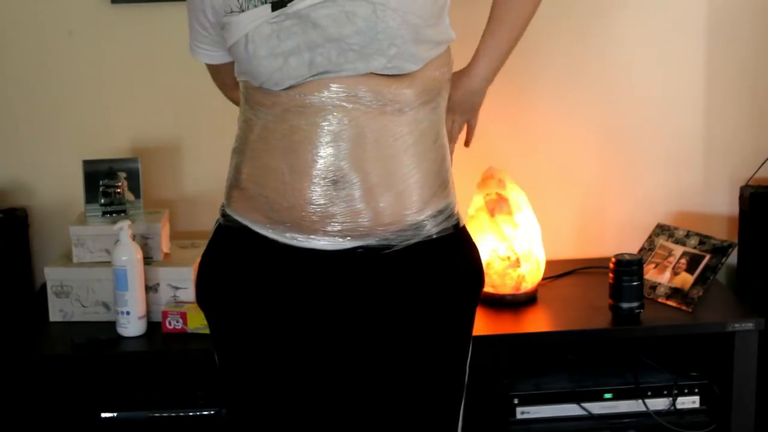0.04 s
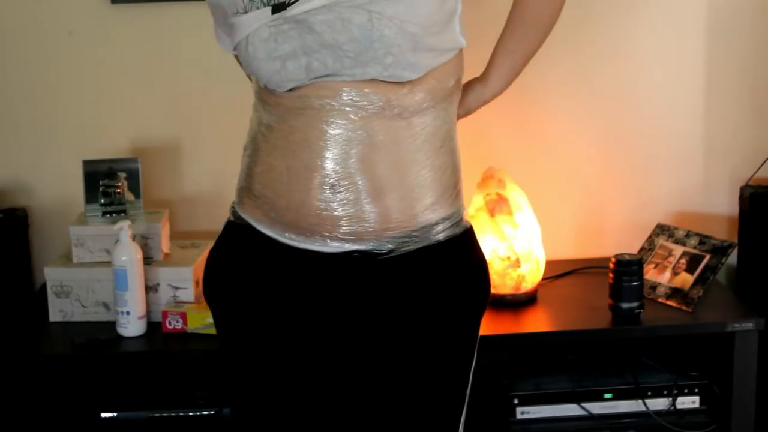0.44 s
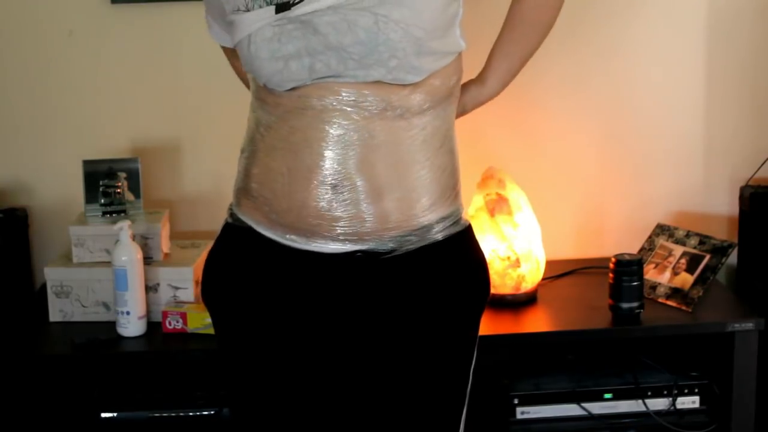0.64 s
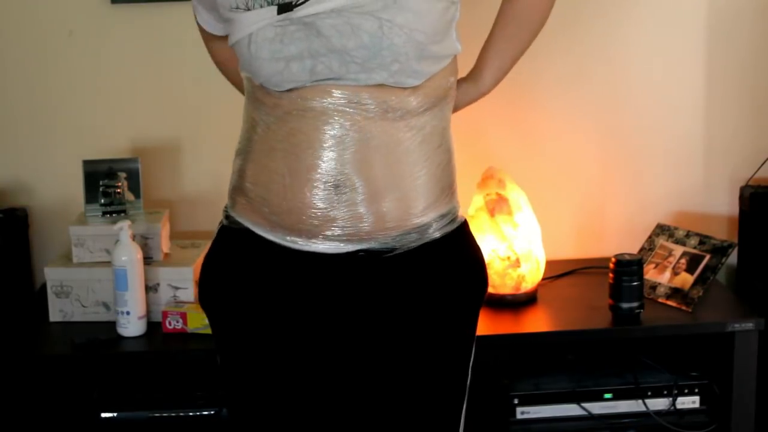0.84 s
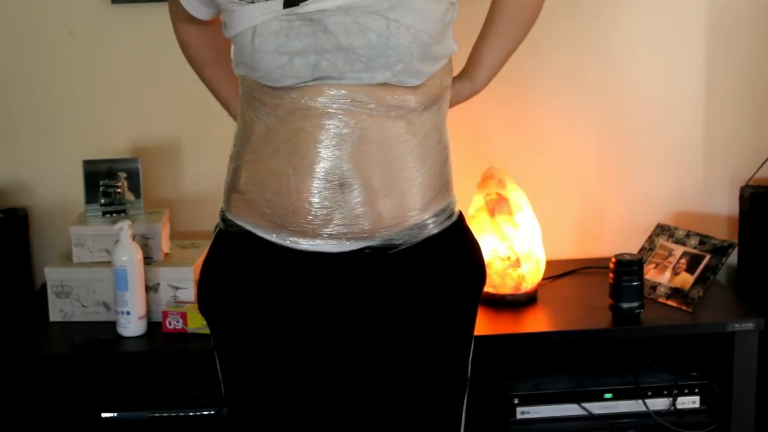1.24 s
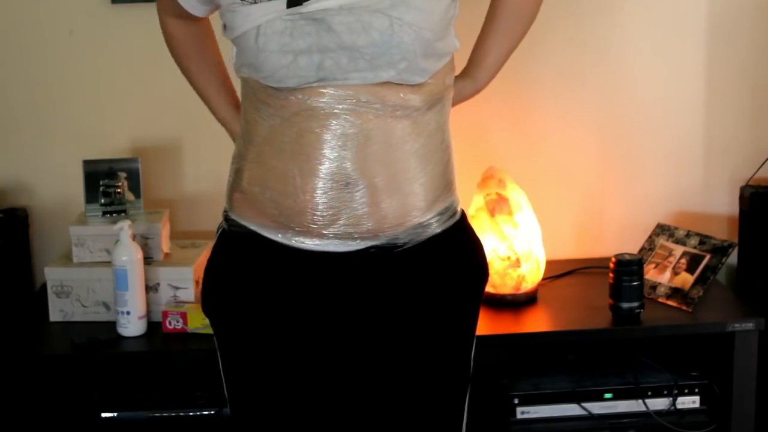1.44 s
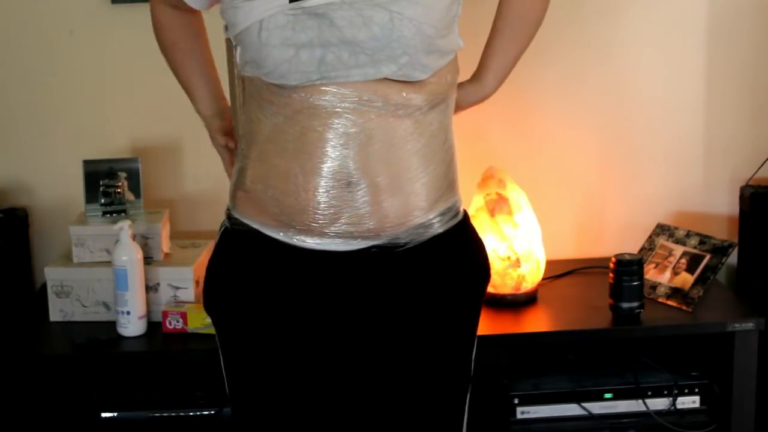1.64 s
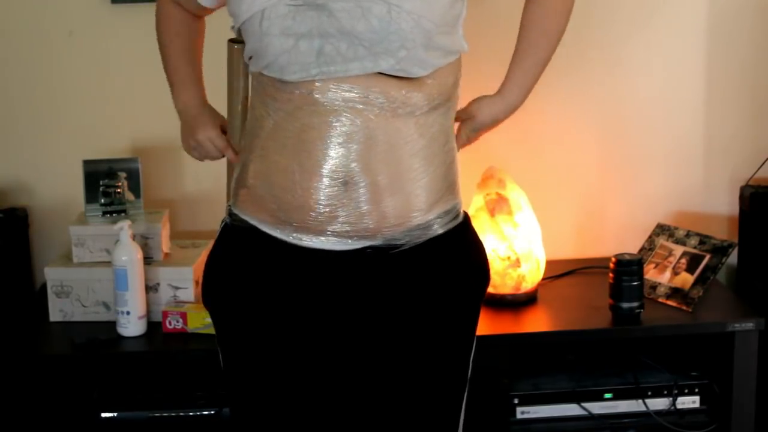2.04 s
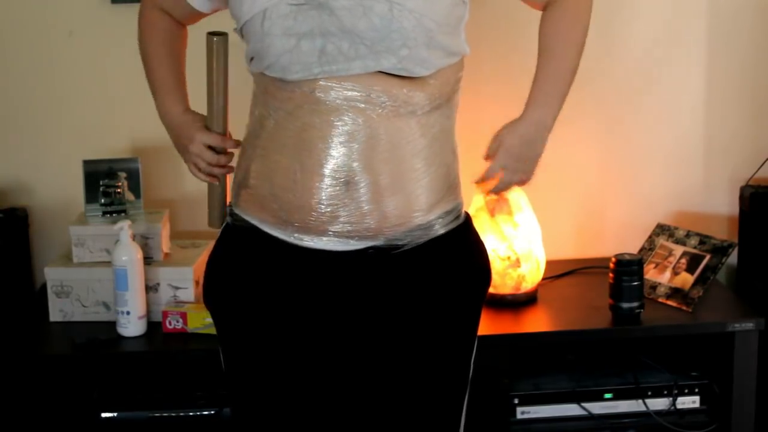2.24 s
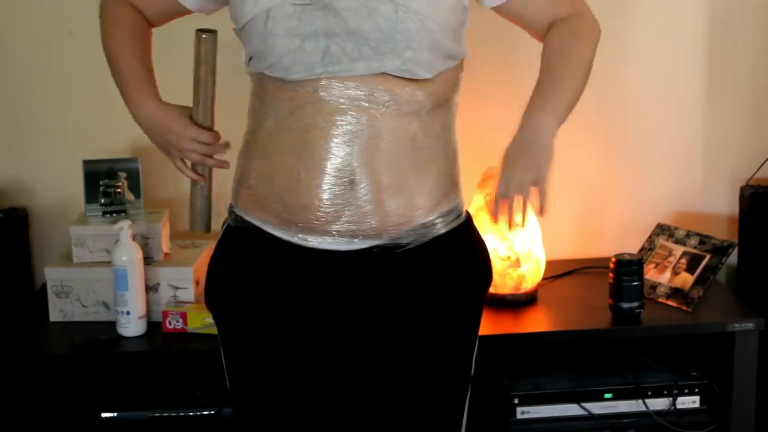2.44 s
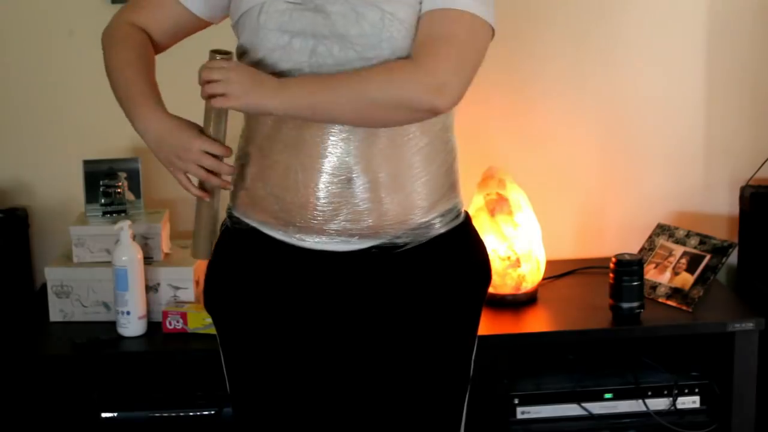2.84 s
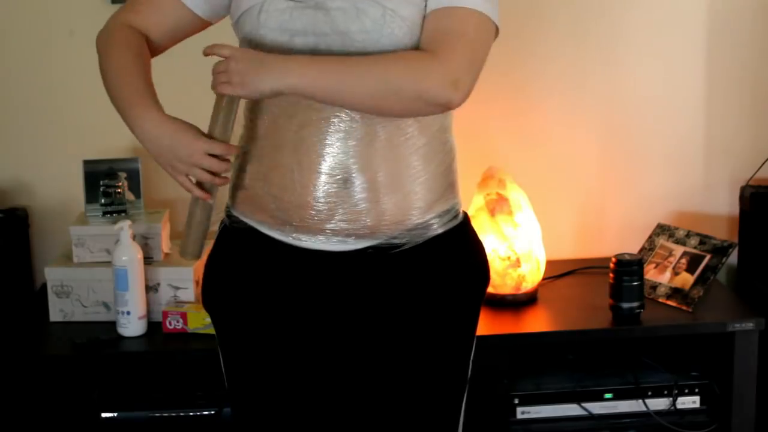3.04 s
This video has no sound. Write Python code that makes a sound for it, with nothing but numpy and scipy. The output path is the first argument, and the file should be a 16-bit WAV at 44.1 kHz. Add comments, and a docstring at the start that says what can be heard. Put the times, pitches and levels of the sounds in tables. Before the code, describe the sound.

Plastic cling film crackles, snaps and squeaks as it is wrapped around a waist.

```python
"""Cling film is pulled off a roll and wound round a waist in a small quiet room.
Pulls peel and rub in swells of dense crackle. Stuck patches let go in snaps, cascades of tiny clicks,
and the large patches ring the taut sheet. In between, the stretched film fizzes, ticks and squeaks.
The wall behind returns a quick inverted echo, ahead of a short diffuse tail."""
import sys
import numpy as np
from scipy import signal
from scipy.fft import rfft, irfft, next_fast_len
from scipy.io import wavfile
from scipy.ndimage import uniform_filter1d

SR = 44100
rng = np.random.default_rng(int(sys.argv[2]) if len(sys.argv) > 2 else 0)


def generate_wav(sig):
    """Save sig (samples, or channels by samples) to the path in sys.argv[1] as 16-bit PCM at SR."""
    pcm = np.round(np.clip(np.atleast_2d(sig).T, -1, 1) * 32767).astype(np.int16)
    wavfile.write(sys.argv[1], SR, pcm)


N = 141120  # 3.2 s

# EQ of film rubbing on film, for pulls and squeaks: (frequency [Hz], gain [dB])
RUB_COLOUR = [(50, -34), (130, -18), (300, -1), (700, 0), (1500, 3.5), (3000, 2.5), (5000, 1), (7500, -2.5),
              (12000, -1.5), (16000, -9)]


def undb(db):
    """Decibels to gain."""
    return 10 ** (np.asarray(db) / 20)


def unit(x):
    """Scale to an energy of one."""
    return x / np.sqrt(np.sum(x ** 2) + 1e-18)


def gains(points, size):
    """Gain at each FFT bin from (frequency [Hz], gain [dB]) points."""
    hz, db = np.array(points, float).T
    return undb(np.interp(np.log(np.fft.rfftfreq(size, 1 / SR) + 1), np.log(hz), db))


def colour(x, *curves):
    """Stack EQ curves into one minimum-phase filter of unit power gain."""
    size = 2 * next_fast_len(len(x) // 2 + 1024)
    gain = np.prod([gains(curve, size) for curve in curves], axis=0)
    cepstrum = irfft(np.log(gain / np.sqrt(np.mean(gain ** 2))))
    cepstrum[1:size // 2] *= 2  # fold forward in time, so nothing rings ahead of a click
    cepstrum[size // 2 + 1:] = 0
    return irfft(rfft(x, size) * np.exp(rfft(cepstrum)))[:len(x)]


def patch_eq(bass, middle, treble):
    """Three-band EQ of one patch of film, in dB against its upper middle."""
    return [(450, bass), (1100, middle), (2200, middle), (4500, 0.008), (9000, treble)]


def clicks(size, per_s, spread_db):
    """Random clicks of either sign, rms one; a positive spread makes a few stand out."""
    size_draw, time_draw, sign_draw = rng.random((size, 3)).T
    strength = undb(spread_db * np.minimum(-np.log(1 - size_draw), 4.5))
    fires = time_draw < per_s / SR
    return unit(fires * np.sign(sign_draw - .5) * strength) * np.sqrt(size)


def add(out, x, start):
    """Mix a sound in at a time in seconds."""
    i = int(round(start * SR))
    x = x[max(-i, 0):max(N - i, 0)]
    out[max(i, 0):max(i, 0) + len(x)] += x


def swell(rise, fall):
    """An envelope that grows and dies exponentially, and the seconds up to its peak."""
    t = np.arange(-int(SR / 4), int(SR / 4)) / SR
    return np.exp(np.where(t < 0, t / rise, -t / fall)), -t[0]


def creep():
    """The stretched film keeps fizzing as the body moves, with lone ticks in between."""
    # fader ride of the fine crackle: (time [s], level [dB])
    ride = [(0, -41.5), (.42, -48.5), (0.509, -50), (.66, -44.5), (.72, -49), (.8, -42.5), (.94, -45.5),
            (1.02, -45), (1.08, -50), (1.2, -44), (1.25, -52), (1.6, -47), (1.98, -43), (2.2, -46),
            (2.34, -44), (2.46, -50.5), (2.76, -46), (3.15, -53.5)]
    # its thin, bright EQ: (frequency [Hz], gain [dB])
    fizz_colour = [(50, -33), (200, -8), (700, -0.5), (1500, 2.5), (4000, 4), (7500, 3), (13000, 4.5),
                   (16000, 4)]
    level = undb(np.interp(np.arange(N) / SR, *np.array(ride).T))
    fizz = undb(-3.5) * clicks(N, per_s=2200, spread_db=-1.0)
    ticks = undb(-7) * clicks(N, per_s=220, spread_db=3.5)
    return colour((fizz + ticks) * level, fizz_colour)


def pulls():
    """The film peels from the roll and drags over the wrap in swells of dense crackle."""
    # tugs on the film: (peak time [s], rise [s], fall [s], level [dB], bass [dB], middle [dB],
    # treble [dB])
    tugs = [(0.086, 0.041, 0.019, -40.5, 9.5, 5, 1.5), (.165, 0.021, .02, -24.5, 8.5, 2.5, -2),
            (0.281, 0.011, 0.045, -36, -13, -6, 1.5), (0.394, 0.0086, 0.016, -31, -3, 2, 3.5),
            (.419, 0.0064, 0.016, -37.5, 4.5, 4, 6), (0.585, 0.009, 0.013, -36.5, 2.5, 7.5, 5.5),
            (.862, 0.031, 0.014, -36, -8, 0, -1), (.975, 0.011, 0.015, -42, -21, -6, 3.5),
            (1.162, 0.021, 0.02, -36, 4.5, 0.5, 3.5), (1.317, 0.014, 0.0089, -38.5, 10, 7, 0),
            (1.36, 0.015, 0.022, -36, 2, -6, -2), (1.42, 0.0034, 0.0082, -30, 5.5, 5, 2.5),
            (1.545, 0.012, 0.007, -43, 13, 11, -1), (1.681, 0.023, 0.01, -33.5, -29, -3, -3),
            (1.765, 0.012, 0.012, -33.5, -6, -4, 1.5), (1.835, 0.022, 0.043, -32.5, -3.5, -1, -3),
            (1.886, 0.0065, 0.014, -29.5, -21, -5, -12.5), (2.035, 0.008, .02, -41.5, 1, 0.5, 0),
            (2.104, 0.019, 0.018, -29.5, -5.5, -4, 0), (2.126, 0.02, 0.015, -30, -9.5, -1, -1),
            (2.264, 0.015, 0.014, -35.5, -23, -2, -5), (2.56, 0.023, 0.0076, -29.5, 9, 0.5, 3),
            (2.608, 0.0085, 0.033, -33, 12, 1, -1), (2.664, 0.031, 0.011, -30.5, 10, 6, 2.5),
            (2.811, .008, .014, -44.5, -1, -2, 3.5), (2.9, 0.012, 0.019, -25, 2.5, 4, 1),
            (2.985, 0.0077, 0.0092, -43, -6, -3, 1), (3.055, 0.0098, 0.021, -44, -5, 0, -3)]
    out = np.zeros(N)
    for peak, rise, fall, db, bass, middle, treble in tugs:
        env, lead = swell(rise, fall)
        crackle = clicks(len(env), per_s=7000, spread_db=1.5) * env
        add(out, undb(db) * colour(crackle, RUB_COLOUR, patch_eq(bass, middle, treble)), peak - lead)
    return out


def snaps():
    """A stuck patch lets go: small clicks build up to one sharp click and die away in a cascade."""
    # patches letting go: (start [s], relative level [dB], relative bass [dB], relative middle [dB],
    # relative treble [dB], build-up [s], cascade decay [s], cascade against the main click [dB])
    releases = [(0.129, -9.5, -31, -14, -17, 0.0031, 0.006, 13),
                (0.136, -9.5, -29, -20, -19, 0.0022, 0.0028, 9),
                (0.151, -13, -22, -10, -14, 0.0024, 0.0066, 1),
                (0.155, -3.5, -29, -16.5, -17, 0.0024, 0.0062, 3.5),
                (0.161, -10, -38, -27, -29, 0.0023, 0.004, 0),
                (0.552, -12, -36.5, -16.5, -11, 0.0034, 0.0031, 9),
                (0.555, -14, -34, -16, -9, 0.0023, 0.0048, 17),
                (0.87, -15, -35, -16.5, -14.5, 0.0032, 0.0039, 8),
                (1.155, -12.5, -38, -21, -25, 0.0029, 0.0057, 9),
                (1.193, -23.5, -32, -16, -4, 0.0025, 0.0044, 5),
                (1.265, -25.5, -19, -13, -5.5, 0.0026, 0.0098, 6),
                (1.308, -19.5, -17, -7, -13, 0.0025, 0.017, 14),
                (1.348, -4.5, -32, -17, -18.5, 0.004, 0.006, 11.5),
                (1.354, -14, -33, -1.5, -1, 0.003, 0.0031, 12),
                (1.359, -13, -27, -10, -14, 0.0029, 0.0037, 8),
                (1.395, -21, -33, -22, -5, 0.0025, 0.0062, 7),
                (1.411, -14.5, -41, -25, -25, 0.0033, 0.0057, 19),
                (1.444, -22.5, -34, -16, -12, 0.0033, 0.005, 11),
                (1.504, -25.5, -35, -28, -12, 0.0022, 0.0059, 16),
                (1.6124, -9, -24.5, -13.5, -22, 0.0012, 0.0096, 3),
                (1.619, -14, -23.5, -12.5, -10, 0.0025, 0.0042, 6),
                (1.654, -8.5, -42, -22, -7, 0.0027, 0.0036, 17),
                (1.671, -15.5, -35, -18, -10, 0.0022, 0.0056, -1),
                (1.675, -9, -37, -25, -21.5, 0.0025, 0.0033, 6),
                (1.804, -13, -32.5, -15.5, -14, 0.0028, 0.0071, 0),
                (1.811, -19.5, -18.5, -33, -12, 0.0023, 0.0032, 16),
                (1.832, -13, -34, -23, -13, 0.0016, 0.0035, 3),
                (1.847, -13.5, -41, -20, -17, 0.0031, 0.0054, 6),
                (2.027, -24.5, -38, -11, -5, 0.0027, 0.005, 5),
                (2.102, -29, -21.5, -27, -6, 0.0035, 0.0047, 14),
                (2.246, -15, -64, -29, -19, 0.0035, 0.003, 18),
                (2.547, -15, -13.5, -9, -14, 0.0023, 0.0036, -10),
                (2.559, -11, -16, -18, -5.5, 0.0026, 0.0027, -3),
                (2.564, -9, -23, -12.5, -11.5, 0.0027, 0.011, -2),
                (2.591, -12, -22, -16, -8, 0.0037, 0.0047, 5),
                (2.652, -10.5, -26, -10, -3, 0.0035, 0.0058, 1),
                (2.672, -10.5, -24, -7.5, -5.5, 0.0027, 0.0054, 17),
                (2.882, -3.5, -19, -6.5, 0, 0.0023, 0.0066, -4),
                (2.887, -6.5, -24, 1, -2, 0.0021, 0.006, 10),
                (2.9, -7, -24.5, -7.5, -11, 0.0022, 0.0062, 1)]
    # mid-forward EQ of every snap: (frequency [Hz], gain [dB])
    snap_colour = [(50, -57), (130, -12), (300, 2), (700, 6), (1500, 8), (3000, 6), (5000, 3), (7500, -1),
                   (12000, -3.5), (16000, -8)]
    trim_db, bass_trim_db, middle_trim_db, treble_trim_db = 8, 29, 16.5, 16
    out, t = np.zeros(N), np.arange(4096) / SR
    for start, db, bass, middle, treble, build, decay, cascade_db in releases:
        fringe = unit(rng.standard_normal(len(t)) * np.exp(-t / .0006))  # roughens the main click
        main_click = unit((t == 0) + 1.5 * fringe)
        env = np.minimum(t / build, 1) ** 0.9 * np.exp(-np.maximum(t - build, 0) / decay)
        cascade = unit(clicks(len(t), per_s=4000, spread_db=2.8) * env)
        snap = unit(np.roll(main_click, int(build * SR)) + undb(cascade_db) * cascade)
        patch = patch_eq(bass + bass_trim_db, middle + middle_trim_db, treble + treble_trim_db)
        add(out, undb(db + trim_db) * colour(snap, snap_colour, patch), start)
    return out


def flaps():
    """A large patch gives way and the taut sheet rings: a dull thud at low Q, a papery knock at high Q."""
    # rings of the sheet: (start [s], level [dB], resonance [Hz], decay [s], sharpness [Q])
    rings = [(.152, -36, 393, 0.013, 7.7), (0.159, -39.5, 177, 0.0077, 2.7),
             (.861, -34.5, 1044, 0.013, 8.3), (1.349, -39, 348, .008, 5), (1.351, -28, 903, 0.0068, 14),
             (1.354, -30.5, 1393, 0.0085, 22), (1.614, -31, 1570, .008, 15), (2.557, -44.5, 218, 0.01, 3.3),
             (2.671, -37, 750, .005, 1.8), (2.885, -30.5, 885, 0.0071, 20), (2.886, -40.5, 180, 0.012, 2.5)]
    out, t = np.zeros(N), np.arange(8192) / SR
    for start, db, hz, decay, q in rings:
        burst = rng.standard_normal(len(t)) * np.exp(-t / decay)
        ring = signal.lfilter(*signal.iirpeak(hz, q, fs=SR), burst)
        add(out, undb(db) * unit(ring) * np.sqrt(decay * SR / 2), start)
    return out


def squeaks():
    """Film sticks and slips on film in short pulse trains, clear or rough, that climb a little in pitch."""
    # slides: (peak time [s], rise [s], fall [s], level [dB], pitch [Hz], jitter [share of the period],
    # treble [dB])
    slides = [(.344, 0.005, .007, -34, 1930, 0.016, 10.5), (.353, 0.0038, .005, -33.5, 1965, .018, 12),
              (.361, .004, .005, -39.5, 2450, .07, -2), (.372, .004, .009, -36.5, 2430, 0.11, 4),
              (.392, .006, 0.0055, -33.5, 1510, 0.063, -3), (.453, 0.0086, 0.0084, -32.5, 1845, 0.18, -2),
              (.462, 0.019, 0.017, -40.5, 2116, .02, 7), (.465, .005, 0.012, -42, 2500, .07, -8),
              (1.222, 0.0071, .012, -49.5, 2500, .04, -6), (2.675, .014, 0.0082, -31, 2292, .16, -3)]
    # presence lift of a squeak: (frequency [Hz], gain [dB])
    squeak_colour = [(1200, -1.5), (2000, 2), (6500, 2.5), (10000, -4)]
    hiss_gain, wander_depth, climb_per_s = 0.59, 0.013, 1.1  # the pitch climbs as the film tightens
    out = np.zeros(N)
    for peak, rise, fall, db, hz, roughness, treble in slides:
        env, lead = swell(rise, fall)
        jitter, wander = rng.standard_normal((2, 2048))
        wander = uniform_filter1d(wander, size=16)
        slip_cycles = np.cumsum(1 + roughness * jitter + wander_depth * wander / wander.std())
        pitch_hz = hz * np.exp(climb_per_s * (np.arange(len(env) + 1) / SR - lead))
        pulses = np.histogram(slip_cycles, np.cumsum(pitch_hz) / SR)[0].astype(float)  # one per slip
        rasp = (pulses - pulses.mean()) / pulses.std() + hiss_gain * rng.standard_normal(len(env))
        patch = patch_eq(bass=-2.0, middle=3.1, treble=treble)
        add(out, undb(db) * colour(rasp * env, RUB_COLOUR, squeak_colour, patch), peak - lead)
    return out


def tail():
    """A short diffuse room response that dies fastest in the top treble."""
    # reverb bands: (centre [Hz], time to fall 60 dB [s], level [dB])
    bands = [(148, 0.24, -3), (494, 0.19, -5.5), (1500, 0.23, -8.5), (3930, 0.18, -9.5), (7900, 0.18, -8),
             (14000, 0.041, -19)]
    size, build_s = 22050, 0.0085
    t = np.arange(size) / SR
    log_hz = np.log(np.fft.rfftfreq(size, 1 / SR) + 1)
    log_centres = np.log([band[0] for band in bands])
    noise = rfft(rng.standard_normal(size))
    response = np.zeros(size)
    for share, (_, t60, db) in zip(np.eye(len(bands)), bands):
        env = unit(np.exp(-np.log(1000) * t / t60) * (1 - np.exp(-t / build_s)))
        band_noise = irfft(noise * np.interp(log_hz, log_centres, share))
        response += undb(db) * env * band_noise
    return response


def room(x):
    """The film's back radiates to the near wall in opposite phase; the tail shifts as the film moves."""
    wall_delay_s, wall_gain, wall_top_hz = .0061, 0.26, 3070
    sway_hz = 22  # rate of the crossfade round two different tails
    dulled = signal.lfilter(*signal.butter(1, wall_top_hz, fs=SR), x)
    echo = -wall_gain * np.pad(dulled, (int(wall_delay_s * SR), 0))[:N]
    sway = 2 * np.pi * sway_hz * np.arange(N) / SR
    reverb = sum(signal.fftconvolve(x * share, tail())[:N] for share in (np.cos(sway), np.sin(sway)))
    return x + echo + reverb


def room_tone():
    """A faint, steady bed of rumble and hiss."""
    # EQ of the bed: (frequency [Hz], gain [dB])
    bed_colour = [(20, -18), (45, -13.5), (70, -3.5), (130, 0.5), (250, -5.5), (600, -6), (1500, -9.5),
                  (5000, -21), (16000, -18.5)]
    return undb(-54) * colour(rng.standard_normal(N), bed_colour)


def scene():
    """All the film layers play through the room, over the room tone, in mono."""
    bed = room_tone()
    film = snaps() + pulls() + squeaks() + flaps() + creep()
    return (room(film) + bed)[None]


def record(dry):
    """A gentle overall EQ adds a little bass warmth and airy top; the recorder cuts the very top steeply."""
    # overall EQ: (frequency [Hz], gain [dB])
    overall_colour = [(30, 1.5), (180, 1.5), (250, 0.5), (330, 1.5), (480, -1.5), (900, -0.5), (1300, -1),
                      (2100, 0.5), (3000, 0.5), (10000, -.5), (12500, 2.5), (15000, 3)]
    gain_db, top_hz = 1.72, 15850
    heard = undb(gain_db) * colour(dry[0], overall_colour)[None]
    return signal.sosfilt(signal.ellip(10, .2, 80, top_hz, fs=SR, output="sos"), heard)


dry = scene()
out = record(dry)
generate_wav(out)
```